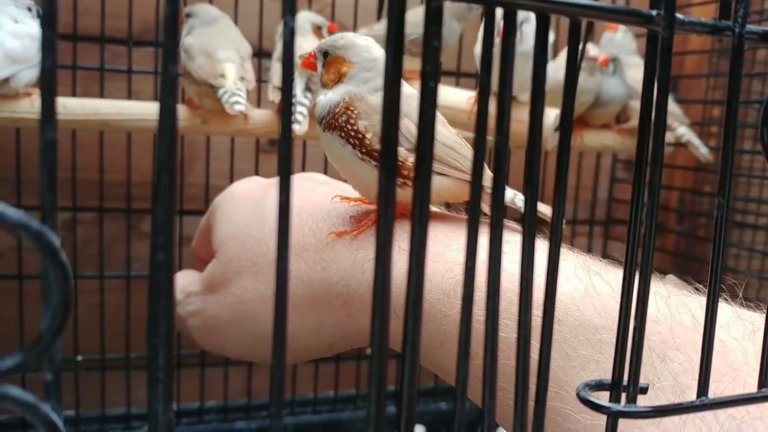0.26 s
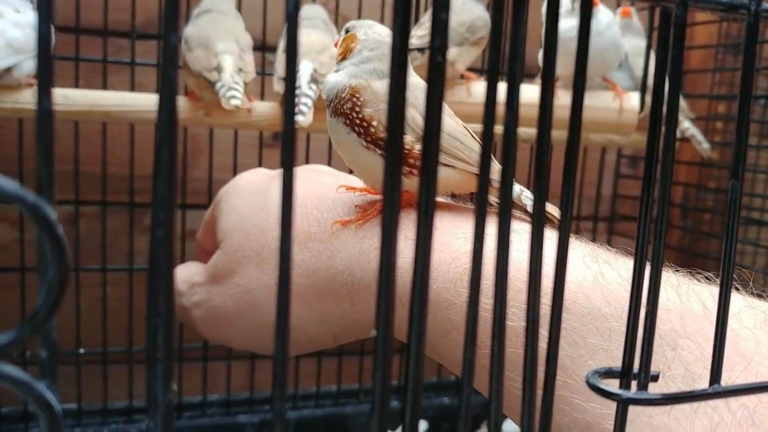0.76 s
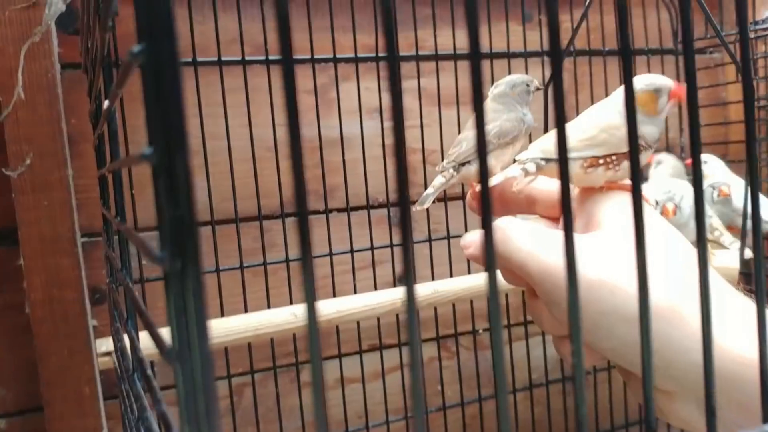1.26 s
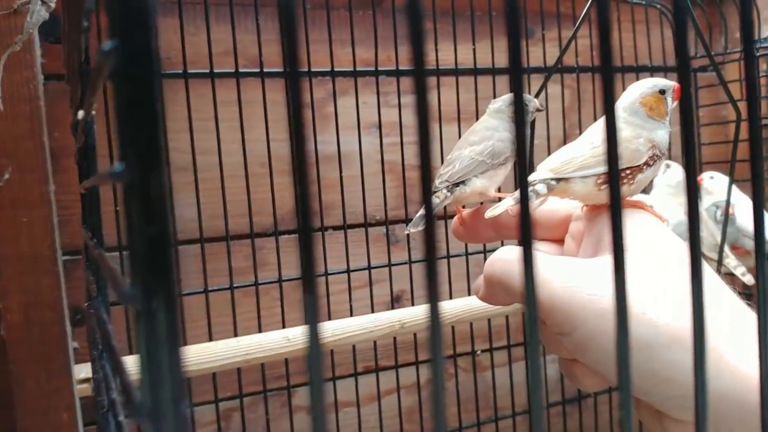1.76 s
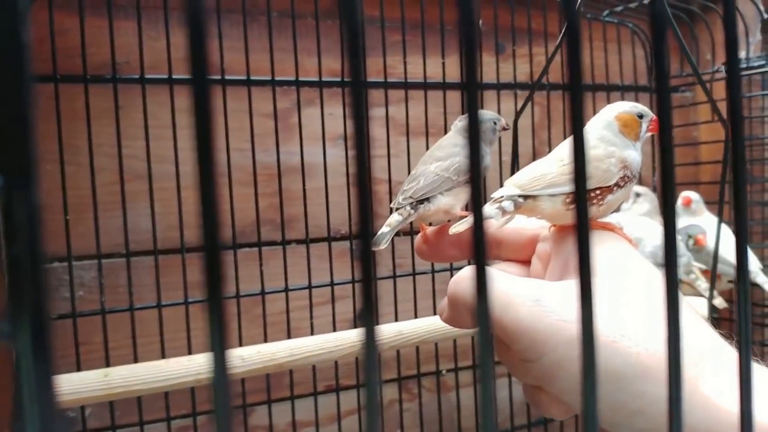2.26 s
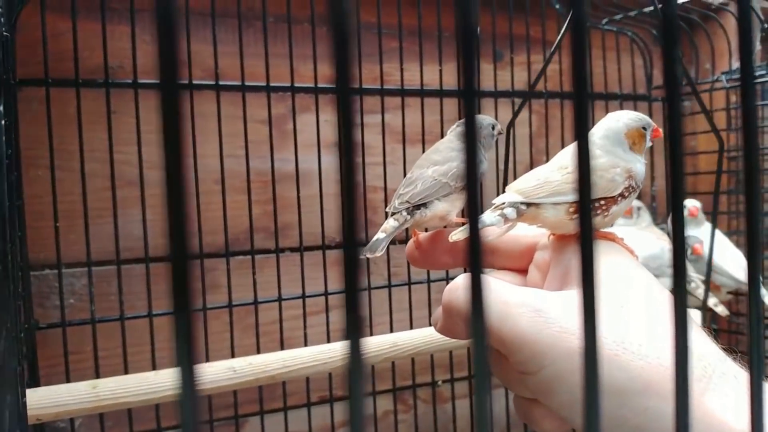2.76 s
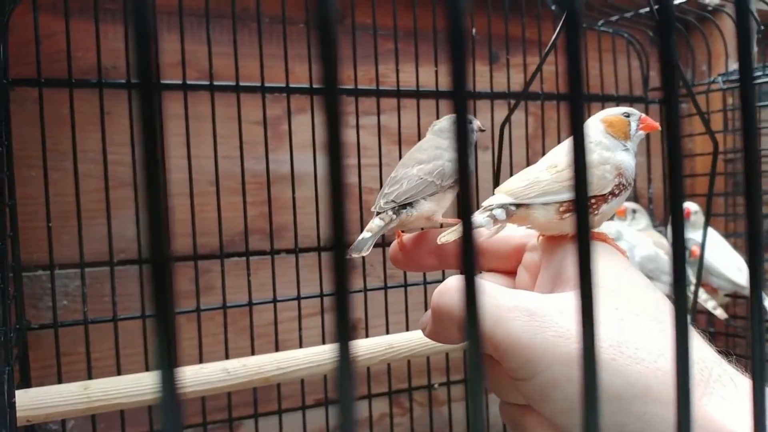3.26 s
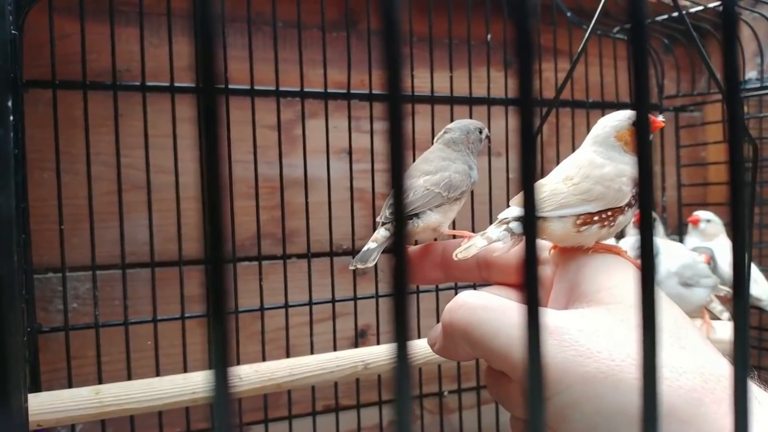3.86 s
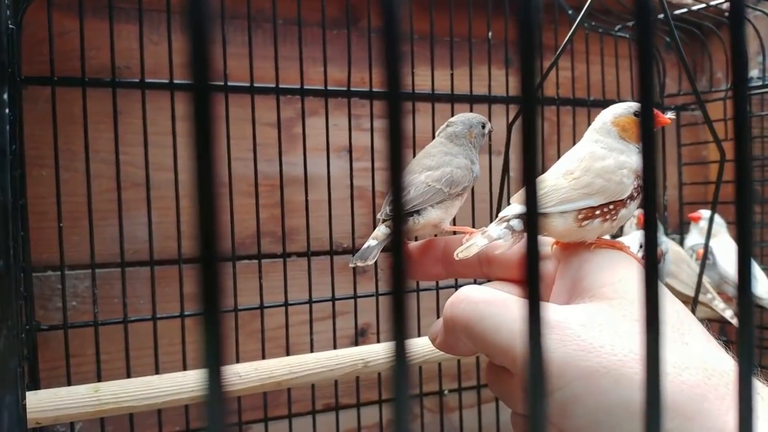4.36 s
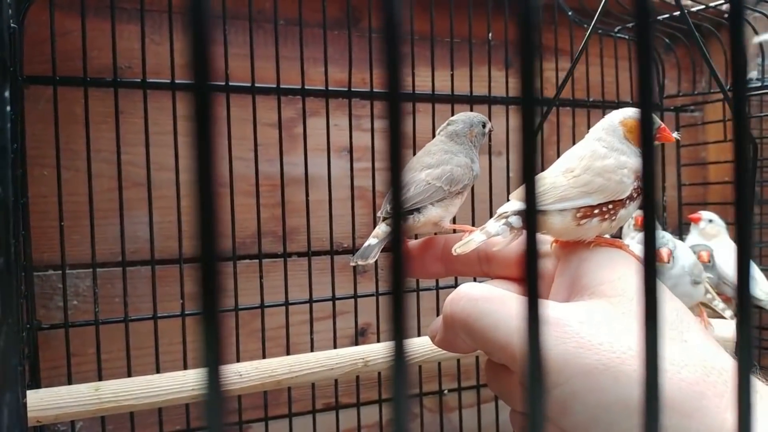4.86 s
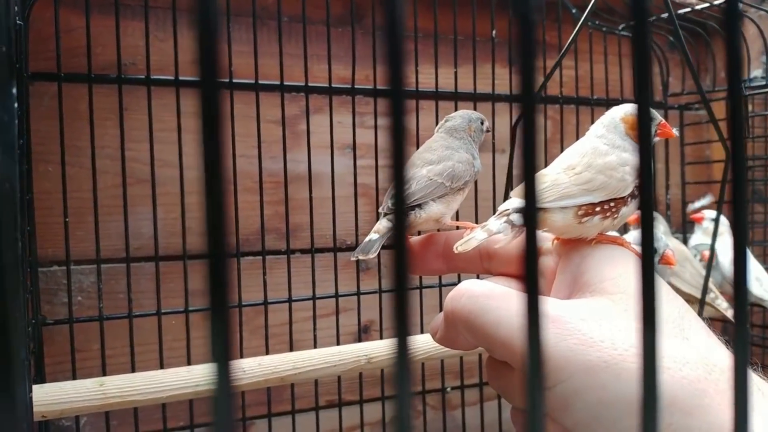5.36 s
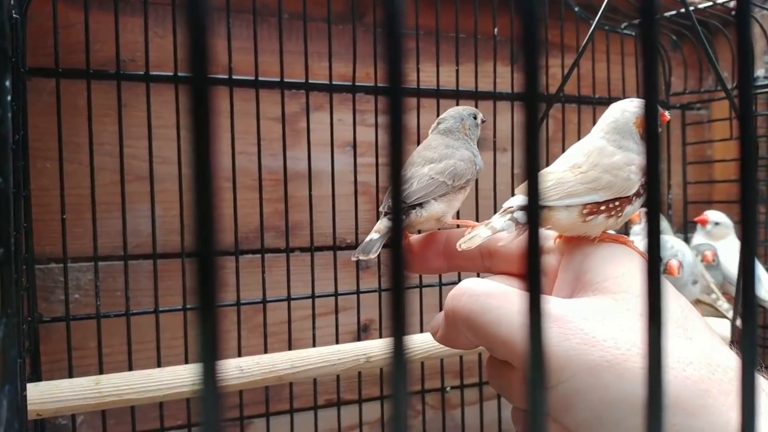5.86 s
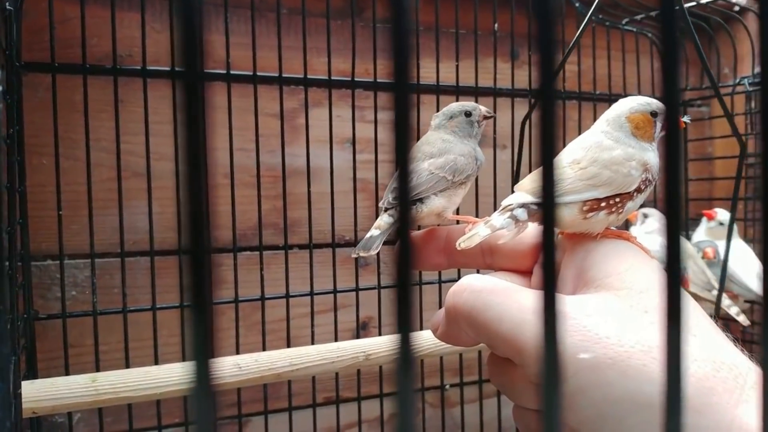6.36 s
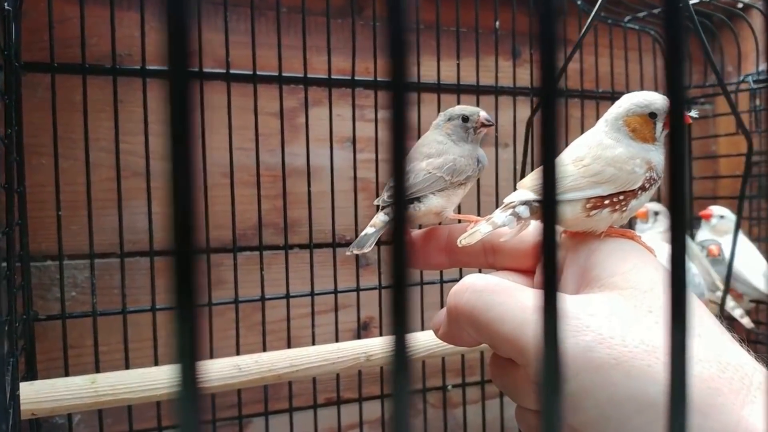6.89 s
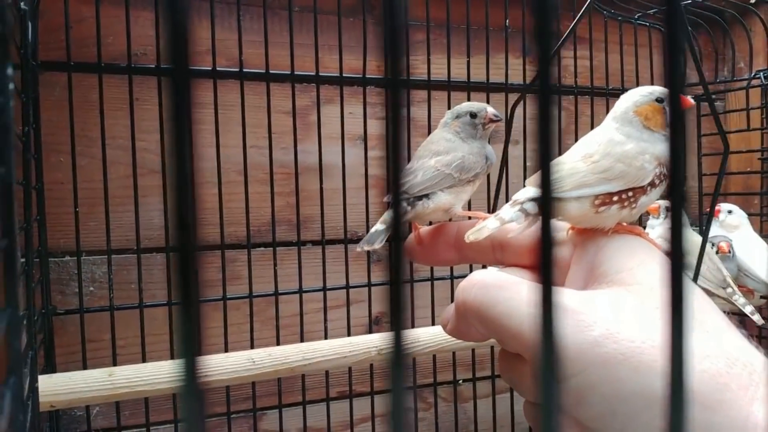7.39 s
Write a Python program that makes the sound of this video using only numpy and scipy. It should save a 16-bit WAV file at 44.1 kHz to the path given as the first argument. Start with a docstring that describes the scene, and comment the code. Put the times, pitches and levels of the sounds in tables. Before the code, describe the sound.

A small flock of caged finches gives short high overlapping calls close by, with soft flutters, perch knocks and claw ticks.

```python
"""Zebra finches at the cage bars.

A flock in a wire cage in a small room, on a pair of microphones just outside the bars. The birds whistle
gliding squeaks and buzz through throat and beak in rasps, nasal notes and short 'tet' calls. Wings flutter,
feet and a hand knock the perches, claws tick on wire. A low rumble and a faint hum lie underneath,
and the sound drops out once for a moment."""
import sys
import numpy as np
from scipy import signal
from scipy.fft import rfft, irfft
from scipy.io import wavfile
from scipy.ndimage import uniform_filter1d

SR = 44100
rng = np.random.default_rng(int(sys.argv[2]) if len(sys.argv) > 2 else 0)


def dump(signal):
    """Clip the signal to [-1, 1] and save it as 16-bit WAV at the path in sys.argv[1]."""
    limited = np.clip(np.atleast_2d(signal).T, -1, 1)
    pcm = np.round(limited * 32767).astype(np.int16)
    wavfile.write(sys.argv[1], SR, pcm)


N = 336483
TIME = np.arange(N) / SR
CUTOFF_HZ = 15800

# Levels in the tables stand before the trims in the functions.
# The near birds' squeaks. Each row: start in seconds, length in seconds, first and last pitch in Hz,
# fundamental in dB, overtones in dB above it, roughness from 0 to 1.
SQUEAKS = [(0.01, 0.067, 888, 1452, -49, -14, 0), (0.183, 0.091, 4175, 2710, -38, -22, .24),
           (0.59, 0.036, 2580, 3070, -30.5, -10, 0.43), (0.626, 0.027, 3167, 3960, -20.5, -8, 0.36),
           (0.719, 0.039, 4530, 4400, -41.5, -17, 0.08), (0.721, 0.071, 2250, 1900, -42, 3.5, 0.33),
           (0.729, .026, 3000, 3030, -33, -16, 0.12), (0.77, 0.032, 3120, 3340, -25.5, -12.5, 0.29),
           (0.809, 0.065, 2747, 3060, -34.5, -13.5, 0.29), (1.002, 0.074, 2674, 1592, -49, -32, 0.23),
           (1.157, 0.026, 2735, 3220, -44, -34, 0.1), (1.248, 0.056, 2550, 3210, -37.5, -21, 0.3),
           (2.049, 0.036, 3785, 3796, -33, -16.5, 0.36), (2.084, 0.047, 2470, 2712, -35, -27, 0.31),
           (2.116, .046, 3660, 3815, -30.5, -14, 0.25), (2.145, 0.069, 3110, 3117, -27.5, -19, 0.34),
           (2.37, 0.073, 3640, 3154, -25.5, -6, 0.19), (2.54, 0.047, 3590, 3083, -25.5, -6.5, 0.31),
           (2.699, 0.066, 3208, 2370, -39.5, -7.5, 0.51), (2.923, .053, 4160, 3050, -50.5, -20, .2),
           (2.983, .085, 2430, 1624, -52.5, -30, .14), (3.402, 0.031, 2777, 2670, -34.5, -17, 0.56),
           (3.446, 0.022, 4100, 4530, -29, -33, 0.32), (3.468, 0.014, 2780, 3250, -23.5, -23.5, 0.14),
           (3.718, 0.037, 2860, 3990, -43, -36, 0.15), (3.846, 0.029, 3960, 4400, -45, -18.5, 0.15),
           (3.877, .05, 3996, 2647, -31, -15, 0.19), (3.931, 0.046, 2794, 1730, -35.5, -40, 0.14),
           (4.231, .042, 3130, 4176, -34, -32, .27), (6.065, 0.015, 2037, 2310, -42, -9.5, 0.45),
           (6.435, 0.074, 4410, 3520, -49, -15, 0.42), (6.661, 0.065, 2517, 2660, -57, 18, .03),
           (6.943, 0.036, 3704, 3770, -29.5, -17.5, 0.43), (6.972, 0.077, 3236, 2932, -22, -19, 0.31),
           (7.137, .015, 2490, 2660, -37.5, -27, 0.12), (7.226, 0.038, 3035, 2895, -43.5, -11.5, 0.44),
           (7.363, 0.03, 2267, 2270, -38, 8.5, 0.29), (7.494, 0.022, 2817, 2950, -34, -5.5, .42),
           (7.545, 0.097, 1574, 2305, -42, -0.5, 0.13), (7.591, 0.022, 3056, 2804, -36.5, -9, 0.42)]
# Single tet calls. Each row: start in seconds, throat resonance in Hz, level in dB.
TETS = [(0.134, 2780, -44.5), (1.88, 3180, -46), (2.298, 3120, -41), (2.834, 3160, -37.5),
        (2.972, 3100, -35.5), (3.119, 2860, -37.5), (3.262, 3040, -39), (4.056, 2450, -56.5),
        (4.948, 2090, -46.5), (5.113, 2170, -49), (6.108, 2390, -42.5), (6.26, 3340, -36.5),
        (6.392, 3350, -42)]
# Harsh calls. Each row: start in seconds, length in seconds, throat resonance in Hz, level in dB.
RASPS = [(0.262, 0.071, 3060, -28.5), (0.345, .042, 3240, -17), (0.438, .058, 3330, -13),
         (1.694, .048, 3820, -25), (2.029, 0.023, 2820, -34), (2.335, .063, 3775, -16.5),
         (2.489, 0.054, 3670, -21), (7.311, 0.033, 3180, -28)]
# Soft nasal calls. Each row: start and length in seconds, pitch and throat resonance in Hz, level in dB.
NASALS = [(1.996, 0.063, 462, 2090, -43), (4.75, 0.2, 516.5, 3480, -63), (5.312, 0.039, 562, 4320, -52.5),
          (6.515, .028, 367, 2540, -34.5), (6.745, .14, 450, 3170, -51.5)]
# Bursts of wingbeats. Each row: start in seconds, seconds until the fade, air push in dB, swish in dB.
FLUTTERS = [(0.247, .11, -55, -55.5), (0.789, 0.036, -38.5, -40), (3.517, 0.069, -38, -40.5),
            (7.395, 0.1, -57, -45.5)]
# The enclosure's low resonances. Each row: centre in Hz, width in Hz, level in dB.
ENCLOSURE_MODES = [(127.1, 21, -10.5), (194.6, 8.7, -4), (248.2, 16, -4), (274.5, 12, -4.5),
                   (326.4, 50, -18)]
# Knocks on perch and frame, then ticks on the wire. Each row: start in seconds, peak in dB.
KNOCKS = [(0.291, -43), (0.331, -40), (1.538, -21), (1.55, -38), (1.622, -23), (2.117, -23), (5.406, -34),
          (6.621, -38), (7.428, -40), (7.467, -46)]
TICKS = [(0.2503, -28), (1.1096, -39), (1.2231, -32), (1.8502, -26.5), (3.197, -28.5), (4.8057, -22),
         (6.074, -28), (6.1958, -43), (6.6226, -34), (7.4939, -21)]
# The frame's modes. Each row: frequency in Hz, level in dB, seconds to fall 60 dB before ring_scale.
FRAME_MODES = [(295, -3.5, 0.043), (559, -5, 0.024), (804, 5, 0.016), (1090, 1, 0.0042), (1436, -7, 0.0353),
               (1510, -2, 0.008), (1920, -2.5, 0.024), (2735, -24.5, 0.016)]
# How the rustle and the rumble rise and fall. Each row: time in seconds, level in dB.
RUSTLE_LEVELS = [(0, -43.5), (.2, -44), (.31, -33), (.57, -56.5), (1.08, -68.5), (1.27, -41), (1.46, -62),
                 (1.6, -38.5), (1.94, -62), (2.2, -54), (2.9, -63.5), (3.3, -59), (4.4, -68), (5.9, -66.5),
                 (6.33, -51), (6.86, -51.5), (7.25, -55), (7.63, -36)]
RUMBLE_LEVELS = [(0, -51), (.17, -50.5), (.33, -36), (.52, -49), (.83, -43), (1.46, -52), (1.72, -48),
                 (2.2, -47), (2.6, -57), (3.42, -52.5), (3.6, -45.5), (4.3, -57.5), (4.8, -61), (5.3, -55),
                 (6.55, -56.5), (6.9, -48.5), (7.25, -56.5), (7.55, -42.5)]
# Tone colours of beak, feathers, wire and background. Each row: frequency in Hz, gain in dB.
BEAK_SPECTRUM = [(1000, -15), (2200, 6), (3200, 13), (4500, -1.5), (6200, -8), (7200, -10.5), (7900, 0),
                 (8700, -9), (10000, -46.5), (14000, -30)]
FEATHER_SPECTRUM = [(350, 6.5), (550, 6.5), (1200, -3), (3000, -3), (5000, -4), (8000, -12), (10000, -38.5),
                    (15000, -43)]
WIRE_SPECTRUM = [(1500, -24), (4000, -3.5), (6000, -3.5), (8000, 5.5), (10000, -32), (15000, -19)]
RUSTLE_SPECTRUM = [(300, -2.5), (700, -2), (1300, 0), (2000, 1.5), (2900, -0.5), (4200, -2.5), (6500, -4),
                   (7900, -3.5), (9000, -17), (10200, -46), (15000, -19)]
RUMBLE_SPECTRUM = [(20, -46), (33, -27), (45, -14), (59, -5), (75, 0), (100, -2.5), (170, -12.5),
                   (270, -14), (400, -21.5), (900, -28), (1500, -48), (3000, -59.5)]
HISS_SPECTRUM = [(120, -34.5), (200, -4), (414, -9), (446, -6.5), (607, -10), (1070, -13.5),
                 (3610, -25), (3960, -17.5), (6710, -41), (15500, -25.5)]


def squeak(length, start_hz, end_hz, level_db, overtone_db, rough, arch_octaves=.056, buzz_hz=620):
    """A high whistle glides along a shallow arch; in a rough one a slower buzz splits it into strands."""
    n = int(length * SR)
    progress = np.linspace(0, 1, n)
    pitch = start_hz * (end_hz / start_hz) ** progress * 2 ** (arch_octaves * np.sin(np.pi * progress))
    pitch *= 1 + .13 * rough * wobble(n, 180)
    buzz = np.sin(phase_of(buzz_hz * (1 + .2 * rng.normal() + .1 * wobble(n, 400))))
    phase = phase_of(pitch * (1 + .12 * rough * wobble(n, 1500))) + 1.4 * rough * buzz
    harmonics = sum((k * pitch < CUTOFF_HZ) * np.sin(k * phase) / k for k in range(2, 6))
    fizz = rough * resonate(rng.standard_normal(n), 7900, 900, order=2) / 2
    overtones = colour(harmonics + fizz, BEAK_SPECTRUM)
    husk = .55 * rough * colour(rng.standard_normal(n), BEAK_SPECTRUM)
    voice = np.sqrt(2) * np.sin(phase) + husk + from_db(overtone_db) * overtones
    shake = unit(1 + .82 * rough * wobble(n, 300))
    return room(from_db(level_db) * voice * shake * swell(n, rise=.28, fall=.35), wet_db=3)


def squeaks():
    """The birds nearest the microphones whistle their squeaks."""
    out = np.zeros((2, N))
    for start, *call in SQUEAKS:
        add(out, start, squeak(*call))
    return out


def syrinx(pitch, jitter, air):
    """The bird's voice organ: a buzz of unsteady pulses, with a puff of air noise in each cycle."""
    phase = phase_of(pitch * (1 + jitter * wobble(len(pitch), 900)))
    harmonics = np.arange(1, int(CUTOFF_HZ / pitch.max()))[:, None]
    lag = np.pi / 2 * harmonics ** 2 / len(harmonics)   # spreads each pulse over part of its cycle
    pulses = unit(np.cos(harmonics * phase - lag).sum(0))
    return pulses + air * rng.standard_normal(len(pitch)) * (1 + np.cos(phase))


def tets(length_s=.029, run_start_s=5.282, run_gap_s=.1368, lowpass_hz=8780):
    """A very short, hoarse buzz sags in pitch and passes through throat and beak."""
    out, n = np.zeros((2, N)), int(length_s * SR)
    # one bird works itself up in an even run, each call louder and more open than the last
    run = [(run_start_s + k * run_gap_s, 2170 + k * 127.6, -49.5 + k * 1.7) for k in range(6)]
    for start, throat_hz, level_db in TETS + run:
        pitch = np.linspace(580, 470, n) * (1 + .1 * rng.normal())
        buzz = syrinx(pitch, jitter=.025, air=.86)
        throat = resonate(buzz, throat_hz, .65 * throat_hz)
        body = .15 * resonate(buzz, 1000, 670, order=2)
        upper = .28 * resonate(buzz, 1.65 * throat_hz, 860)
        beak_db = -17.5 + 19.5 * np.log2(throat_hz / 2770)   # a higher throat rings the beak more
        voice = unit(throat + body + upper) + from_db(beak_db) * resonate(buzz, 8100, 1400)
        add(out, start, room(from_db(level_db) * voice * swell(n, rise=.5, fall=.6), wet_db=5))
    return signal.sosfilt(signal.butter(12, lowpass_hz, fs=SR, output="sos"), out + 1e-18)


def rasps(pitch_hz=620, balance_db=-17, fizz_db=-39):
    """A forced, chaotic buzz through two broad resonances; the louder, the shriller."""
    out = np.zeros((2, N))
    for start, length, throat_hz, level_db in RASPS:
        n = int(length * SR)
        buzz = syrinx(pitch_hz * np.linspace(1.1, .9, n), jitter=.078, air=1)
        lower = resonate(buzz, throat_hz, 1500) + .21 * resonate(buzz, 2410, 640)
        upper = resonate(buzz, 1.82 * throat_hz, 2600) + .1623 * resonate(buzz, 8200, 860)
        shrillness = from_db(.92 * (level_db - balance_db))
        fizz = from_db(fizz_db) * resonate(buzz, 13800, 3000, order=2)
        voice = unit(lower + shrillness * upper) + fizz
        add(out, start, room(from_db(level_db) * voice * swell(n, rise=.4, fall=.22), wet_db=4))
    return out


def nasals(sag_share=.0477):
    """A clear buzz, rich in harmonics, sinks slightly in pitch as it sounds through the throat."""
    out = np.zeros((2, N))
    for start, length, pitch_hz, throat_hz, level_db in NASALS:
        n = int(length * SR)
        buzz = syrinx(pitch_hz * (1 + sag_share * np.linspace(.5, -.5, n)), jitter=.01, air=.3)
        voice = resonate(buzz, throat_hz, 3000) + .28 * resonate(buzz, 1010, 480, order=2)
        add(out, start, room(from_db(level_db) * voice * swell(n, rise=.082, fall=.12), wet_db=2.5))
    return out


def wings(beats_per_s=27, attack_s=.05, fall_db_per_s=140.5, push_trim_db=9.5, swish_trim_db=4):
    """Each wingbeat pushes air into the enclosure's low resonances and swishes the feathers."""
    out, t = np.zeros((2, N)), np.arange(SR // 2) / SR
    beat = .45 + np.sin(np.pi * beats_per_s * t) ** 4
    for start, length, push_db, swish_db in FLUTTERS:
        effort = np.minimum(t / attack_s, 1) * from_db(-fall_db_per_s * np.maximum(t - length, 0))
        puffs = beat * rng.standard_normal(len(t))
        boom = sum(from_db(db) * resonate(puffs, hz, width, order=2) for hz, width, db in ENCLOSURE_MODES)
        boom /= np.sqrt(uniform_filter1d(boom ** 2, size=1500) + 1e-4)   # evens out chance swells
        add(out, start, boom * effort * from_db(push_db + push_trim_db) * pan(left_db=3))
        swish = effort * colour(beat * rng.standard_normal(len(t)), FEATHER_SPECTRUM)
        add(out, start, room(swish * from_db(swish_db + swish_trim_db), wet_db=3.5, lag_s=.0001))
    return out


def knocks(trim_db=-2, ring_scale=1.1):
    """Feet and a hand knock the perches and ring the frame's modes, in a new mix each time."""
    out, t = np.zeros((2, N)), np.arange(SR // 5) / SR
    for start, peak_db in KNOCKS:
        ring = np.zeros(len(t))
        for hz, db, t60 in FRAME_MODES:
            decay = from_db(db + 3 * rng.normal() - 60 * t / (ring_scale * t60))
            ring += decay * np.sin(2 * np.pi * hz * t) * rng.choice([-1, 1])
        ring /= abs(ring).max()
        add(out, start, room(from_db(peak_db + trim_db) * ring, wet_db=3.5, lag_s=.0001))
    return out


def ticks(trim_db=-5, decay_s=.002):
    """Claws and beaks strike the wire in brief, bright bursts of noise."""
    out, t = np.zeros((2, N)), np.arange(SR // 5) / SR
    for start, peak_db in TICKS:
        tick = colour(rng.standard_normal(len(t)), WIRE_SPECTRUM) * np.exp(-t / decay_s)
        add(out, start, room(from_db(peak_db + trim_db) * tick / abs(tick).max(), wet_db=6.5))
    return out


def peeps(tries_per_s=5.4, length_s=.046, pitch_hz=2860, calm_db=-67):
    """The rest of the flock peeps at random while restless, about as loud as its rustle."""
    out = np.zeros((2, N))
    for start in rng.uniform(0, N / SR, int(tries_per_s * N / SR)):
        start_hz, end_hz = pitch_hz * np.exp(rng.uniform(-.22, .22, 2))
        rustle_db = np.interp(start, *np.transpose(RUSTLE_LEVELS))
        if rustle_db > calm_db:
            add(out, start, squeak(length_s, start_hz, end_hz, rustle_db + 1, overtone_db=-17, rough=.28))
    return out


def rustle(trim_db=-1, patchy_db=9):
    """The flock's diffuse rustle comes in patches, each band of noise flickering on its own."""
    edges = np.geomspace(300, CUTOFF_HZ, num=17)
    patches = np.zeros((2, N))
    for low, high in zip(edges, edges[1:]):
        band = resonate(rng.standard_normal((2, N)), np.sqrt(low * high), high - low, order=2)
        patches += np.sqrt(high - low) * band * from_db(patchy_db * wobble(N, 35))
    level_db = np.interp(TIME, *np.transpose(RUSTLE_LEVELS)) + trim_db + .51 * wobble(N, 30)
    return from_db(level_db) * colour(patches, RUSTLE_SPECTRUM)


def rumble(trim_db=-2, hum_hz=59, hum_trim_db=-2.5):
    """A low rumble and a hum swell together, alike at both microphones but louder on the left."""
    level_db = np.interp(TIME, *np.transpose(RUMBLE_LEVELS))
    noise = rng.standard_normal(N) + .24 * rng.standard_normal((2, N))
    low = from_db(level_db + trim_db) * colour(noise, RUMBLE_SPECTRUM)
    hum = from_db(level_db + hum_trim_db) * resonate(rng.standard_normal(N), hum_hz, 16, order=2)
    return (low + hum) * from_db([[2.0], [-2.4]])


def hiss(level_db=-67):
    """A faint, steady floor of noise, separate at each microphone."""
    return from_db(level_db) * colour(rng.standard_normal((2, N)), HISS_SPECTRUM)


def room(x, wet_db, lag_s=.00041, early_t60=.088, late_t60=.25, late_db=-20, build_s=.0023):
    """From perch to microphones: the direct sound, dense echoes off the near walls, a soft tail."""
    t = np.arange(int(.2 * SR)) / SR
    decay = from_db(-60 * t / early_t60) + from_db(late_db - 60 * t / late_t60)
    echoes = rng.standard_normal((2, len(t))) * decay * (1 - np.exp(-t / build_s))
    paths = from_db(wet_db) * unit(echoes) / np.sqrt(len(t))
    paths[0, int(lag_s * SR)] += 1   # the direct sound reaches the left microphone later
    paths[1, 0] += 1
    heard = signal.fftconvolve(x[None], paths, axes=1)
    source_rms = np.sqrt(np.sum(x ** 2) / heard.shape[1])
    return unit(heard) * source_rms * pan(left_db=3.5)


def from_db(db):
    """Decibels to gain."""
    return 10 ** (np.asarray(db) / 20)


def pan(left_db):
    """Gains that put the left channel this far above the right."""
    return from_db([[left_db / 2], [-left_db / 2]])


def unit(x):
    """Scale to rms 1."""
    return x / np.sqrt(np.mean(x ** 2) + 1e-20)


def phase_of(hz):
    """Running phase of a moving pitch, in radians."""
    return 2 * np.pi * np.cumsum(hz) / SR


def colour(x, spectrum):
    """Filter a sound by a spectrum table; rms 1."""
    n = x.shape[-1]
    hz, db = np.transpose(spectrum)
    bins_hz = np.arange(n // 2 + 1) * SR / n
    gain = from_db(np.interp(np.log(bins_hz + 1e-3), np.log(hz), db))
    return unit(irfft(rfft(x) * gain, n))


def resonate(x, hz, width_hz, order=3):
    """A resonance, steeper with a higher order; rms 1."""
    low = np.sqrt(hz ** 2 + width_hz ** 2 / 4) - width_hz / 2
    high = min(low + width_hz, SR / 2 - 1)
    return unit(signal.sosfilt(signal.butter(order, [low, high], "band", fs=SR, output="sos"), x))


def wobble(n, rate_hz):
    """Random motion of spread about 1."""
    steps = np.arange(n) * rate_hz / SR
    count = int(steps[-1]) + 2
    return np.interp(steps, np.arange(count), rng.standard_normal(count))


def swell(n, rise, fall):
    """A call's envelope, with rise and fall as shares of its length; rms 1."""
    progress = np.linspace(0, 1, n)
    opening = np.sin(np.pi / 2 * np.minimum(progress / rise, 1))
    closing = np.sin(np.pi / 2 * np.minimum((1 - progress) / fall, 1))
    return unit(opening * closing)


def add(track, start_s, sound):
    """Mix a sound in at a time."""
    i = max(int(start_s * SR), 0)
    track[..., i:i + sound.shape[-1]] += sound[..., :N - i]


def scene(squeak_db=1.5, tet_db=5.5, rasp_db=-1):
    """Birds, cage and room as they reach the microphones outside the bars."""
    calls = from_db(squeak_db) * squeaks() + from_db(tet_db) * tets()
    calls += from_db(rasp_db) * rasps() + nasals()
    movement = wings() + knocks() + ticks()
    background = rumble() + (rustle() + hiss()) * pan(left_db=2.4)
    return calls + movement + background + peeps()


def record(dry, ceiling=.85, dropout_start_s=1.315, dropout_end_s=1.44):
    """The loudest peaks are rounded, the sound drops out briefly, and the top is cut."""
    rounded = dry / (1 + (dry / ceiling) ** 6) ** (1 / 6)
    running = (TIME < dropout_start_s) | (TIME > dropout_end_s)
    gate = uniform_filter1d(running.astype(float), size=64) + 1e-3
    return signal.sosfilt(signal.ellip(10, .1, 80, CUTOFF_HZ, fs=SR, output="sos"), rounded * gate)


dry = scene()
out = record(dry)
dump(out)
```